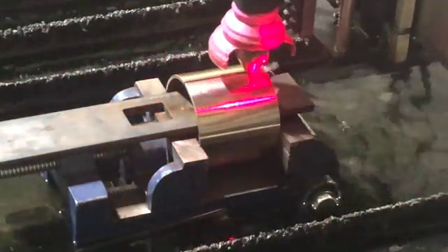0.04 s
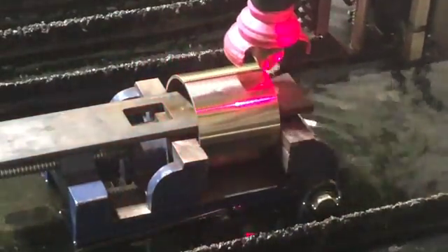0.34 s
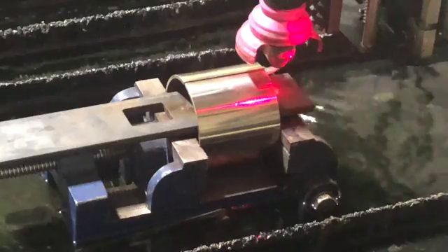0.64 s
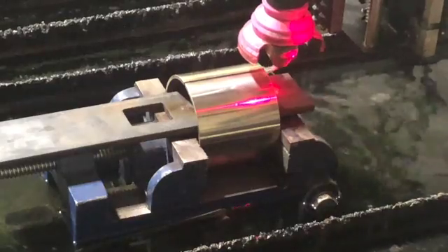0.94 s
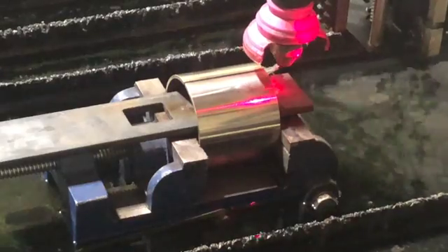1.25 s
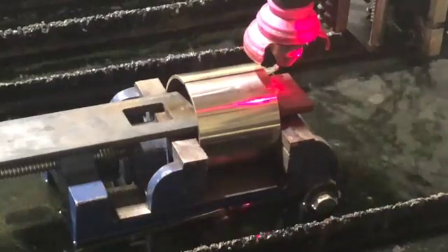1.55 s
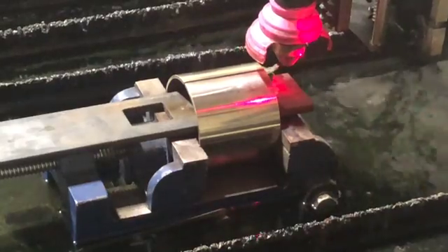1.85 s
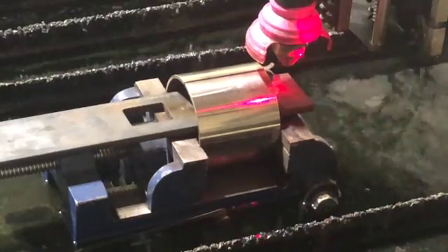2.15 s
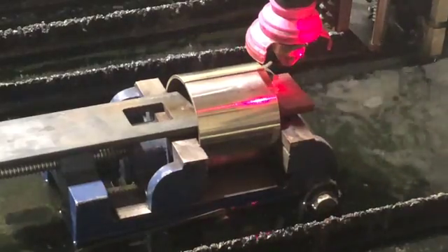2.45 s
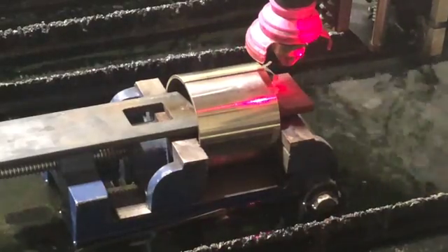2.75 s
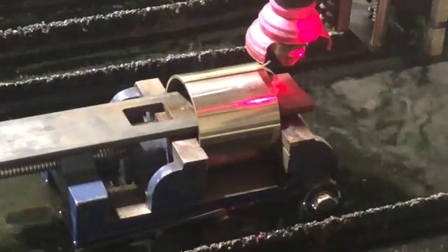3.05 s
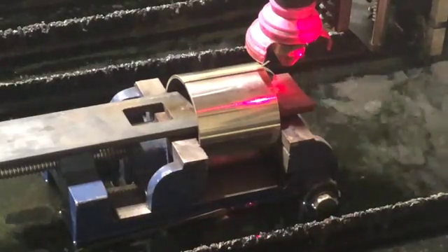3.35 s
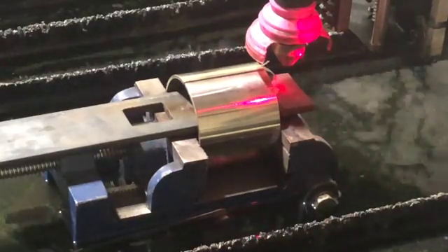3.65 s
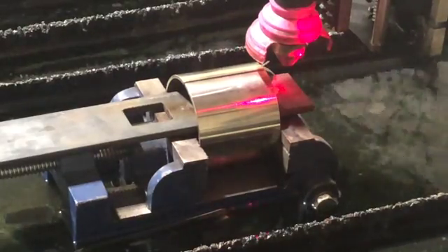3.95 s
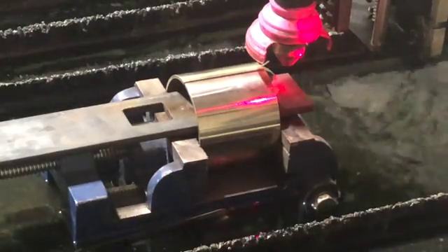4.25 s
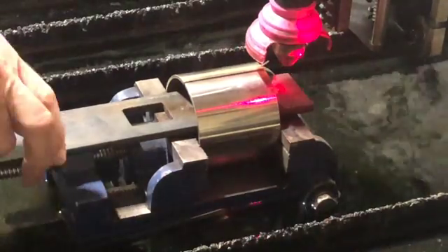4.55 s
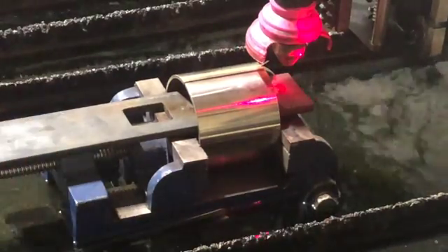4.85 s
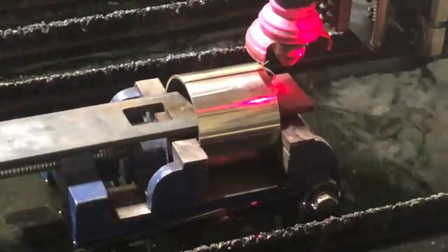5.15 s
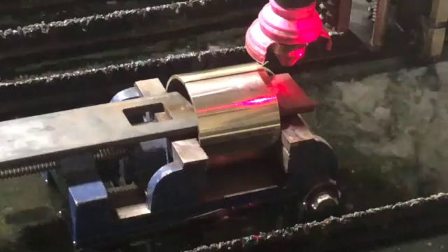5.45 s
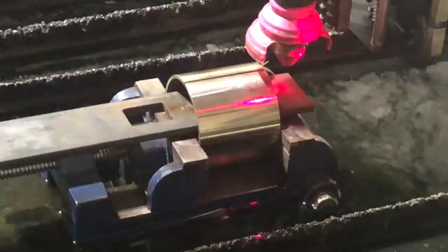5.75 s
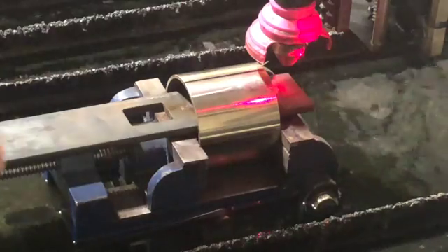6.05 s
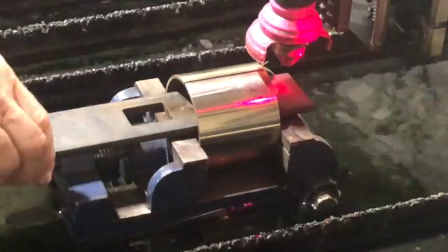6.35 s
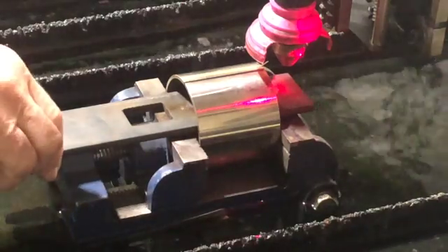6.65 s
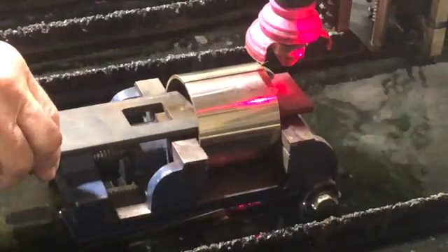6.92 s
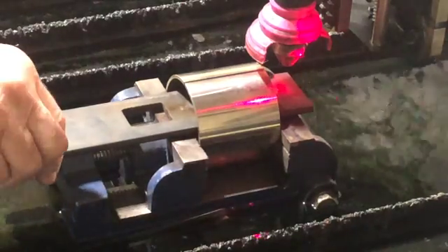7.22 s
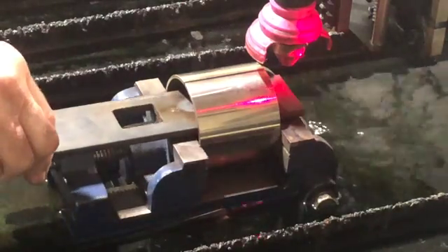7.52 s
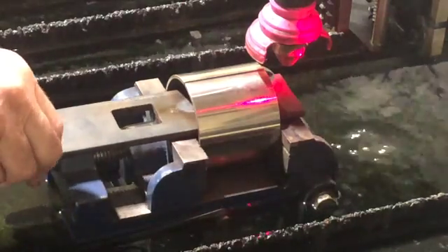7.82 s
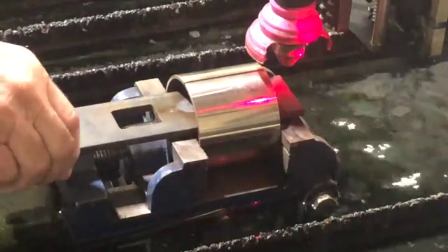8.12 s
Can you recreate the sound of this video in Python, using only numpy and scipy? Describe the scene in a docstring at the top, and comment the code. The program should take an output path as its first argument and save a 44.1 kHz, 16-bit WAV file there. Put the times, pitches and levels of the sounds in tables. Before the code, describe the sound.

Compressed air hisses and sizzles from a torch nozzle across a metal tube, with faint breathy whistles and a low rush underneath.

```python
"""Plasma torch blowing air

After a cut, the torch keeps blowing as it creeps over the end of a metal tube above a water table.
The jet hisses, air roars over the water, the nozzle sizzles and the hollow of the tube hums.
Edges in the stream sing briefly, and near the end the jet catches the rim and rings the tube.
Stray gusts buffet the microphone."""
import sys
import numpy as np
from scipy import signal
from scipy.fft import rfft, irfft, next_fast_len
from scipy.io import wavfile
from scipy.ndimage import map_coordinates

SR = 44100
rng = np.random.default_rng(int(sys.argv[2]) if len(sys.argv) > 2 else 0)


def store_wav(level_fs):
    """Save 16-bit WAV to argv[1]."""
    pcm = np.round(np.clip(np.atleast_2d(level_fs), -1, 1) * 32767)
    wavfile.write(sys.argv[1], SR, pcm.T.astype(np.int16))


N = 369558
TIME = np.arange(N) / SR


def undb(db):
    """Turn decibels into a gain."""
    return 10 ** (np.asarray(db) / 20)


def unit(x):
    """Scale a sound to an average (rms) level of 1."""
    return x / np.sqrt(np.mean(x ** 2))


def ramp(at_s, length_s):
    """A smooth move from 0 to 1, half done at at_s."""
    return .5 + .5 * np.sin(np.pi * np.clip((TIME - at_s) / length_s, -.5, .5))


def between(pair, share):
    """Blend from the first value of a pair to the second."""
    return pair[0] + (pair[1] - pair[0]) * share


def flutter(rate_hz, depth_db):
    """A gain that wanders at random, rate_hz times a second."""
    steps = rng.standard_normal(2048)
    return undb(depth_db * np.interp(TIME * rate_hz, np.arange(len(steps)), steps))


def turbulence(spectrum):
    """Churning air: noise shaped by a table of frequencies and levels."""
    size = next_fast_len(N, real=True)
    hz, db = np.transpose(spectrum)
    bins = np.maximum(np.fft.rfftfreq(size, 1 / SR), 1)
    gain = undb(np.interp(np.log(bins), np.log(hz), db))
    bass_cut = np.minimum(bins / hz[0], 1) ** 2
    return unit(irfft(rfft(rng.standard_normal(size)) * gain * bass_cut, size)[:N])


def blown(hz, width_hz):
    """One breathy note: noise passed twice through a resonance."""
    resonance = np.concatenate(signal.iirpeak(hz, hz / width_hz, fs=SR))
    return signal.sosfilt([resonance, resonance], rng.standard_normal(N))


def resonances(table, rate_hz, flutter_db):
    """Several fluttering notes, mixed to an overall level of 1."""
    return unit(sum(undb(db) * flutter(rate_hz, flutter_db) * blown(hz, width)
                    for hz, width, db in table))


def singing(table, flutter_db):
    """Small swirls of air sing several notes, each at its own level."""
    return sum(undb(db) * flutter(rate_hz=26, depth_db=flutter_db) * unit(blown(hz, width))
               for hz, width, db in table)


# Puffs of air: (middle time [s], swell time [s], highest frequency [Hz], level [dB])
GUSTS = [(1.15, 0.22, 179, -59), (2.814, 0.053, 40, -32.5), (2.852, 0.04, 114, -38),
         (2.99, 0.11, 38, -44.5), (3.08, 0.018, 90, -43.5), (3.46, 0.05, 50, -53), (4.22, 0.072, 35.7, -53)]
def gusts(low_hz=18.6):
    """Slow swirls of air push on the microphone and make it rumble."""
    out = np.zeros(N)
    for at_s, swell_s, high_hz, db in GUSTS:
        swell = np.exp(-.5 * np.minimum(((TIME - at_s) / swell_s) ** 2, 100))
        band = signal.butter(3, [low_hz, high_hz], "band", fs=SR, output="sos")
        puff = swell * signal.sosfilt(band, rng.standard_normal(N))
        out += undb(db) * puff * np.sqrt(np.sum(swell ** 2) / np.sum(puff ** 2))
    return out


# Tone of the spreading air: (frequency [Hz], relative level [dB])
ROAR = [(16, 5.5), (30, -3.5), (50, -4.5), (75, -9.5), (105, -4), (140, -11.5), (250, -7.5), (380, -4),
        (700, -1.5), (1200, -3), (1800, -7), (4000, -50)]
def table_roar(push_db):
    """Air roars as it spreads over the water and the table, louder with more flow."""
    return undb(-49.5 + 0.48 * push_db) * turbulence(ROAR)


# Notes of the air inside the tube: (pitch [Hz], width [Hz], relative level [dB])
HOLLOW = [(945.5, 190, 0), (2800, 350, -8)]
def hollow_hum(level_db=(-47.5, -43.5)):
    """The hollow of the tube hums, louder once the jet reaches its mouth."""
    at_mouth = ramp(at_s=4.4, length_s=1.5)
    return undb(between(level_db, at_mouth)) * resonances(HOLLOW, rate_hz=22, flutter_db=0.8)


def gap_note(crossed, pitch_hz=(2684, 2090), level_db=(-46.5, -45.5), spread_hz=210):
    """The air between torch and tube resonates, lower as the gap changes shape."""
    lowpass = signal.butter(2, spread_hz, fs=SR, output="sos")
    wobble = signal.sosfilt(lowpass, rng.standard_normal((2, N)))
    phase = 2 * np.pi * np.cumsum(between(pitch_hz, crossed)) / SR
    note = unit(wobble[0] * np.cos(phase) + wobble[1] * np.sin(phase))
    return undb(between(level_db, crossed)) * note


# Notes of the jet on the tube wall: (pitch [Hz], width [Hz], level [dB])
WALL = [(3254, 530, -48.5), (4260, 660, -49), (8080, 950, -45.5), (11110, 600, -47.5), (13180, 340, -41),
        (14330, 350, -49)]
def wall_song(crossed):
    """Swirls sing on the wall and fade as the jet slides off it."""
    return (1 - crossed) * singing(WALL, flutter_db=1.25)


# Notes of the jet past the tube's end: (pitch [Hz], width [Hz], level [dB])
OPEN_END = [(3800, 600, -49.5), (5080, 420, -46.5), (6070, 1400, -43.5), (7220, 450, -44.5),
            (10330, 1000, -47.5), (13400, 410, -47), (14050, 350, -42), (15300, 800, -38.5)]
def open_end_song():
    """New swirls sing once the jet is past the end."""
    return ramp(at_s=5.13, length_s=.6) * singing(OPEN_END, flutter_db=1.1)


# Edges the jet sweeps over: (middle time [s], length [s], pitch [Hz], width [Hz], level [dB])
EDGES = [(.24, 0.46, 1020, 480, -42.5), (3.46, 0.51, 10900, 960, -41), (3.95, 0.75, 7260, 1900, -40),
         (4.202, .06, 8350, 320, -40), (4.42, .14, 13400, 450, -36), (4.6, .47, 4170, 570, -46),
         (4.78, 1.0, 10140, 1860, -37.5), (4.95, 0.9, 13290, 600, -35.5), (4.98, .6, 14780, 780, -34.5),
         (5.02, .5, 3310, 500, -43.5), (5.6, .5, 13700, 1300, -32), (5.76, 1, 6030, 2400, -38.5)]
def edge_songs(fade_s=0.34):
    """Each edge sheds swirls and sings one note while it lies in the stream."""
    out = np.zeros(N)
    for at_s, length_s, hz, width, db in EDGES:
        inside = (length_s / 2 - np.abs(TIME - at_s)) / min(fade_s, length_s / 2)
        out += np.clip(.5 + inside, 0, 1) * singing([(hz, width, db)], flutter_db=1.14)
    return out


# Ringing notes of the tube: (pitch [Hz], width [Hz], relative level [dB])
TUBE = [(2430, 190, -12), (2720.0, 280, -4.1), (3610, 150, -2.5), (4693, 160, 3), (5120, 370, -2.5),
        (5860, 360, 0), (6400, 560, -1.5), (7300, 400, 1.2), (7770, 410.0, 0), (14150, 340.0, -1)]
def rim_ring(at_s=7.42, growth_db_per_s=0.5):
    """The jet catches the rim and rings the tube, slowly getting louder."""
    gain = undb(-32 + growth_db_per_s * (TIME - at_s)) * ramp(at_s, length_s=.16)
    return gain * resonances(TUBE, rate_hz=24, flutter_db=0.5)


# High notes of the nozzle: (pitch [Hz], width [Hz], relative level [dB])
NOZZLE = [(12610, 1430, -4.4), (13370, 950, -2.7), (13780, 590, -3.9), (14250, 970, -1.2),
          (15320, 670, -8.8)]
def nozzle_sizzle(push_db):
    """Air rushing through the nozzle makes it sizzle, louder with more flow."""
    return undb(-33.5 + 0.44 * push_db) * resonances(NOZZLE, rate_hz=32, flutter_db=2.0)


# Tone of the jet: (frequency [Hz], relative level [dB])
JET = [(700.0, -6), (1300.0, -5.5), (1650.0, -8.5), (2100.0, -0.7), (2600.0, -2.5), (3400.0, -3.5),
       (4500.0, -2), (6200.0, -0.75), (7200.0, 0.2), (8200.0, 1.2), (8900.0, -1.5), (10300.0, -1),
       (11700.0, -1), (15600.0, -4.5)]
def jet_hiss(crossed, delay_ms=(0.304, 0.504), echo_gain=(0.17, .04)):
    """The hiss meets its echo off the tube; dips in its tone slide down as the path grows."""
    hiss = turbulence(JET) * flutter(rate_hz=25, depth_db=0.46)
    delay_s = between(delay_ms, crossed) / 1000
    echo = map_coordinates(hiss, [(TIME - delay_s) * SR], order=3)
    return unit(hiss + between(echo_gain, crossed) * echo)


def workshop_echo(air, level_db=-17, decay_s=0.1):
    """The vice and the table's slats scatter the hiss for a moment."""
    t = TIME[:SR // 8]
    tail = rng.standard_normal(len(t)) * undb(-60 * t / decay_s) * (t > .002)
    return air + undb(level_db) * signal.fftconvolve(air, tail / np.linalg.norm(tail))[:N]


# Strength of the air stream: (time [s], jet level [dB])
FLOW = [(0, -37), (.6, -34.5), (3.2, -34.5), (4.3, -31), (5.0, -29.5), (6.3, -30.5), (7.2, -30.5),
        (7.5, -30), (8.38, -29.5)]
def scene():
    """Mix the air sounds, steered by the flow and the torch's position, then add the gusts."""
    flow_db = np.interp(TIME, *np.transpose(FLOW))
    push_db = flow_db + 32  # how far the jet is above -32 dB
    crossed = ramp(at_s=4.0, length_s=1.3)  # 0: jet on the tube wall, 1: past its end
    air = undb(flow_db) * jet_hiss(crossed)
    air += nozzle_sizzle(push_db) + table_roar(push_db)
    air += hollow_hum() + gap_note(crossed)
    air += wall_song(crossed) + open_end_song() + edge_songs()
    air += rim_ring()
    return np.tile(workshop_echo(air) + gusts(), (2, 1))  # same sound in both channels


def record(dry, top_hz=15720):
    """The recorder cuts off the highest treble."""
    return signal.sosfilt(signal.ellip(12, .1, 80, top_hz, fs=SR, output="sos"), dry)


dry = scene()
out = record(dry)
store_wav(out)
```